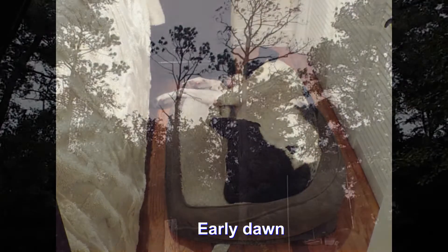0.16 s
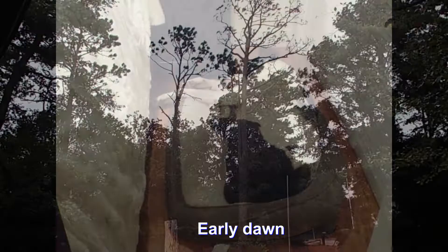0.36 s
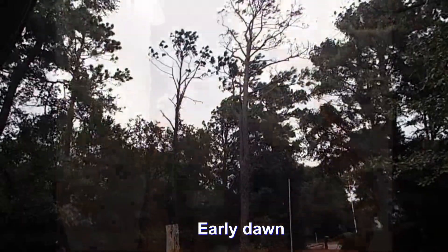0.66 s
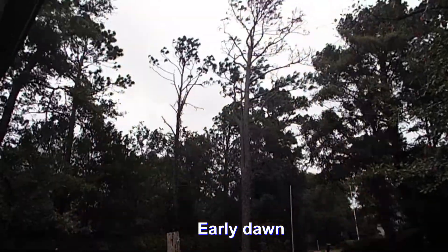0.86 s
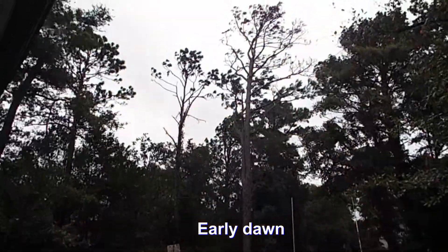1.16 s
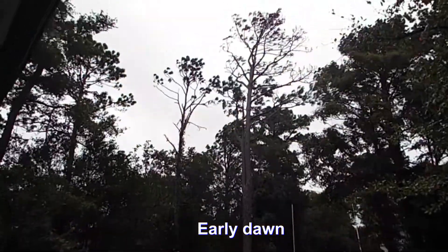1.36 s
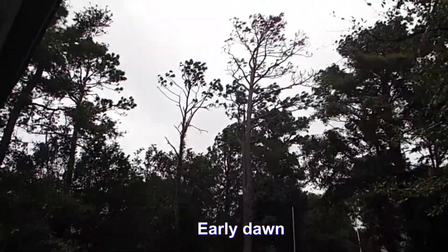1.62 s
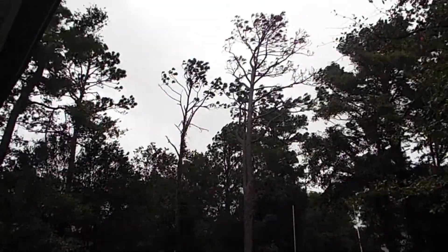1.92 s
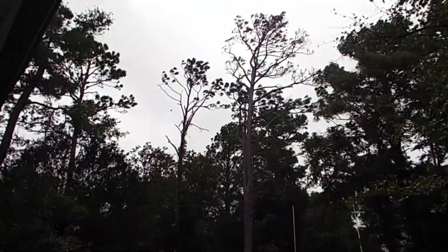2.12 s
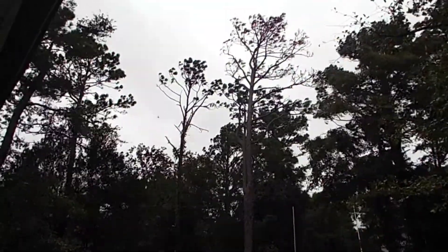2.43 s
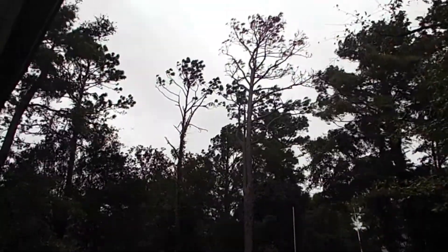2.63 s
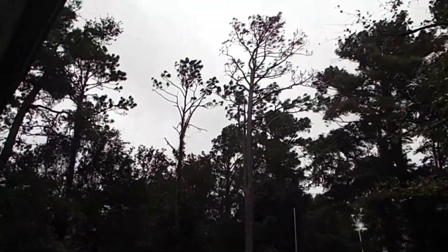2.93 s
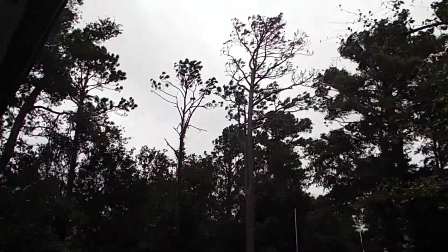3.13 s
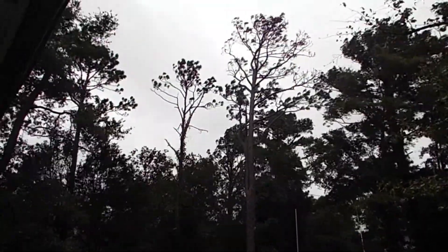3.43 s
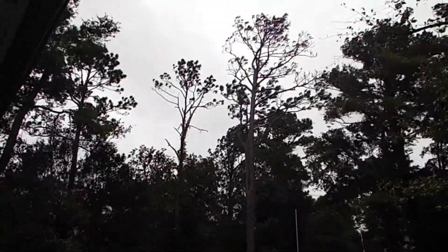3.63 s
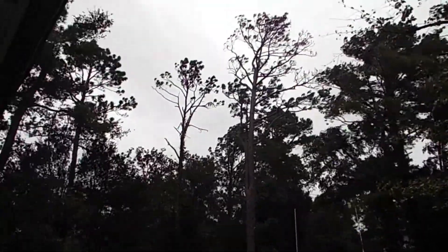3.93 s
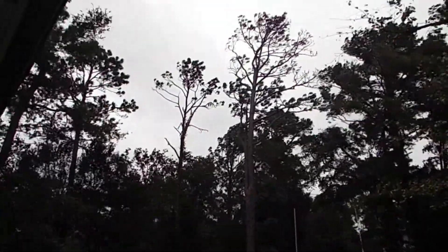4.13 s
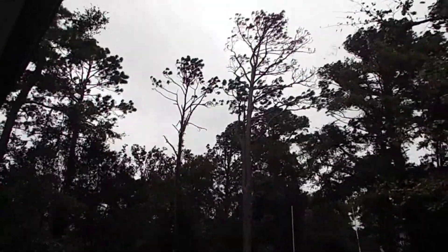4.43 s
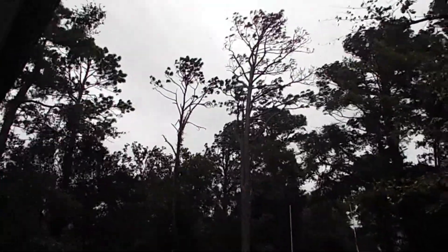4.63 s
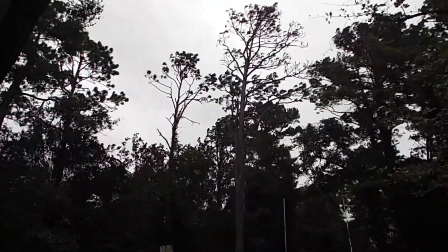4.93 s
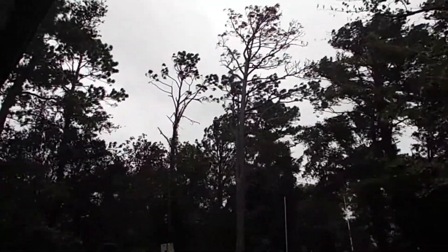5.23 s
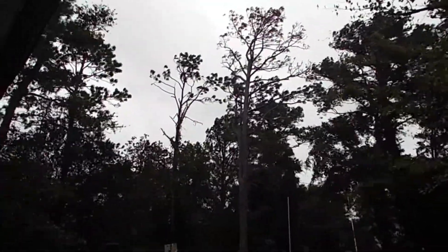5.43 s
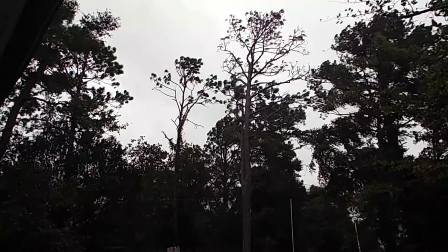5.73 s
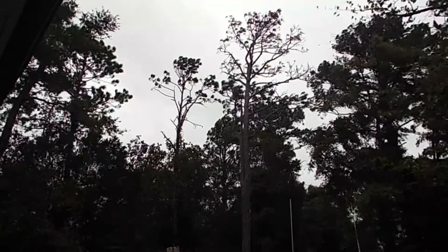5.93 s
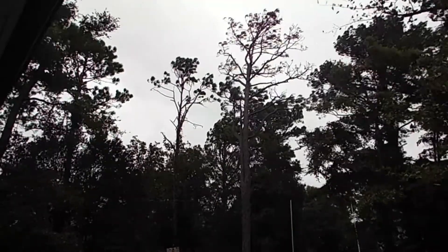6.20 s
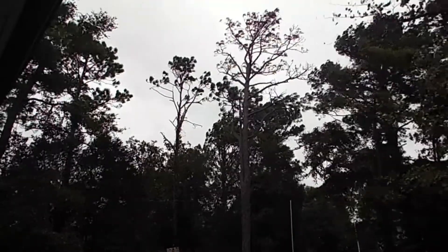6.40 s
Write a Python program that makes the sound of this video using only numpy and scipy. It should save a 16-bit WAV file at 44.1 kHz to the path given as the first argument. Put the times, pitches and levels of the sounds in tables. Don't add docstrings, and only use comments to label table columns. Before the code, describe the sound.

Storm wind blows through tall pines outdoors, heard on a small camera with two close microphones. From 0 to 0.8 seconds the rush fades in: a smooth, dense hiss of needles and twigs above a lower, broad roar from the limbs. Between about 0.65 and 1.5 seconds soft, dull puffs of wind bump the microphones, some on the left, some on the right. The hiss keeps growing through 2 and 3 seconds, with a brief low flutter near 2.4 to 2.9, mainly left. From 3.5 it is clearly stronger and brighter, with only very fine flutter. From 4.9 to 5.7 the gust peaks, and quick buffeting thumps hit either side, hardest around 5.3. After that the hiss eases by several decibels until the end at 6.5 seconds, still steady and strong.

```python
import sys
import numpy as np
from scipy import signal
from scipy.fft import rfft, irfft
from scipy.io import wavfile

SR = 44100
rng = np.random.default_rng(int(sys.argv[2]) if len(sys.argv) > 2 else 0)


def pcm_store(signal):
    levels = np.round(np.clip(np.atleast_2d(signal), -1, 1) * 32767)
    wavfile.write(sys.argv[1], SR, levels.astype(np.int16).T)


def invert_db(level):
    return 10 ** (np.asarray(level, dtype=float) / 20)


N = 289296
TIME_S = np.arange(N) / SR
TOP_HZ = 15190


def at_hz(points, hz):
    point_hz, value = np.transpose(points)
    return np.interp(np.log(hz), np.log(point_hz), value)


def drift(rate_hz):
    thin, settle = 40, 2000
    pole = np.exp(-2 * np.pi * rate_hz * thin / SR)
    noise = rng.standard_normal(N // thin + settle + 2)
    slow = signal.lfilter([1], [1, -2 * pole, pole ** 2], noise)[settle:]
    return np.interp(np.arange(N) / thin, np.arange(len(slow)), slow / slow.std())


def canopy(sway_db, patch_db):
    # time_s, level_db
    gust = [(0.0, -28.5), (1.1, -26.5), (2.2, -23.4), (3.0, -22.3), (3.5, -19.5), (4.25, -18), (4.9, -17.5),
            (5.35, -16.5), (5.9, -19), (6.56, -21.5)]
    # needle_hiss_hz, limb_roar_hz, twig_rush_hz, tip_sizzle_hz
    part_hz = (4500, 450, 1500, 10500)
    # limb_db, twig_db, tip_db
    part_share = (.1, -0.11, 0.045)
    # limb_db_per_s, twig_db_per_s, tip_db_per_s
    part_db_per_s = (-0.67, -.5, 0.43)
    # freq_hz, density_db_per_hz
    canopy_spectrum = [(45, -38.5), (130, -18.5), (310, -6.5), (660, -1), (960, -4.5), (1260, -2.5),
                       (1550, -3.5), (2500, -4.5), (5100, 0), (5700, -0.4), (7300, -7.5), (10600, -15.5),
                       (13000, -25.5), (15200, -36)]
    # freq_hz, difference_over_sum_db
    port_difference = [(30, -46), (300, -35), (700, -32.5), (1300, -28), (2400, -18.5), (4400, -13.5),
                       (8000, -9.5), (11000, -5.5), (15000, -1.5)]
    # freq_hz, left_over_right_db
    port_lean = [(1500, 0.0), (4400, .35), (8100, 1.3), (15000, 1.7)]
    # low_hz, high_hz
    hiss_range = (2500, 7500)

    hz = np.maximum(np.fft.rfftfreq(N, 1 / SR), 1)
    both, apart = rfft(rng.standard_normal((2, N))) * invert_db(at_hz(canopy_spectrum, hz))
    hiss = (hz > hiss_range[0]) & (hz < hiss_range[1])
    scale = N / np.sqrt(2 * np.sum(np.abs(both[hiss]) ** 2))
    apart = apart * invert_db(at_hz(port_difference, hz))
    lean = invert_db(at_hz(port_lean, hz) / 2)
    ports = scale * np.array([(both + apart) * lean, (both - apart) / lean])

    hiss_db = np.interp(TIME_S, *np.transpose(gust))
    offsets_db = [np.zeros(N)]
    for share, db_per_s in zip(part_share, part_db_per_s):
        offset_db = share * hiss_db + db_per_s * TIME_S
        offsets_db.append(offset_db - offset_db.mean())
    parts = sorted(zip(part_hz, offsets_db), key=lambda part: part[0])

    crown_sway = drift(4.4)
    out = np.zeros((2, N))
    centres_hz = 40 * 2.0 ** np.arange(10)
    for centre_hz in centres_hz:
        octaves = np.log2(np.clip(hz, centres_hz[0], centres_hz[-1]) / centre_hz)
        window = np.cos(np.pi / 2 * np.clip(octaves, -1, 1)) ** 2
        part_db = np.zeros(N)
        for own_hz, offset_db in parts:
            weight = at_hz([(f, f == own_hz) for f, _ in parts], centre_hz)
            part_db += weight * offset_db
        flutter_db = sway_db * crown_sway + patch_db * drift(6.6)
        out += invert_db(0.4 + hiss_db + part_db + flutter_db) * irfft(ports * window, N)
    return out


def port_wind_db():
    # start_s, hold_s, level_db
    spells = [(0.0, .2, -70), (0.33, .12, -63), (0.67, .15, -64), (0.97, 0.3, -55), (1.95, .01, -66),
              (2.44, 0.54, -58), (3.14, .03, -62), (4.05, .01, -68), (4.6, 0.17, -53), (5.03, .15, -50),
              (5.33, .02, -42), (5.62, .1, -51), (5.85, .15, -65), (6.42, .03, -68)]
    rise_db_per_s, fall_db_per_s, lull_db = 130, 130, -84
    level_db = np.full(N, float(lull_db))
    for start_s, hold_s, peak_db in spells:
        rise_db = rise_db_per_s * np.maximum(start_s - TIME_S, 0)
        fall_db = fall_db_per_s * np.maximum(TIME_S - start_s - hold_s, 0)
        level_db = np.maximum(level_db, peak_db - rise_db - fall_db)
    return level_db


def buffeting():
    low_hz, high_hz, bright_hz, dull_hz = 60, 400, 620, 190
    lumps_db, lumps_hz = 0.5, 25.0
    level_db = port_wind_db()
    bandpass = signal.butter(1, [low_hz, high_hz], "band", fs=SR, output="sos")
    noise = signal.sosfilt(bandpass, rng.standard_normal((2, N)))
    noise = signal.sosfilt(signal.butter(2, bright_hz, fs=SR, output="sos"), noise)
    dull = signal.sosfilt(signal.butter(2, dull_hz, fs=SR, output="sos"), noise)
    bright = np.clip((level_db + 65) / 16, 0, 1)
    mixed = bright * noise / noise.std() + (1 - bright) * dull / dull.std()
    lumps = invert_db(lumps_db * np.array([drift(lumps_hz), drift(lumps_hz)]))
    return invert_db(level_db) * mixed * lumps / np.sqrt(np.mean(lumps ** 2))


def puffs():
    # time_s, peak_db, swing_hz, place (-1 right port to +1 left port)
    eddies = [(0.286, -46, 72, 0.0), (0.362, -49, 64, 0.0), (0.656, -39, 207, -0.9),
              (0.84, -44.2, 220, 0.9), (0.907, -33, 168, 0.9), (0.945, -41, 176, 0.9),
              (0.975, -36, 202, 0.9), (1.127, -35.4, 166, 0.9), (1.144, -33, 112, -0.14),
              (1.25, -31, 130, 0.0), (1.256, -25, 190, -0.95), (1.402, -29, 119, 0.13),
              (1.402, -25, 210, -0.82), (1.518, -42, 105, 0.0), (2.452, -38, 90, 0.9),
              (2.838, -28, 235, 0.9), (2.874, -38, 167, 0.9), (4.897, -27, 236, 0.9),
              (4.982, -33, 238, -0.9), (5.067, -21, 258, -0.83), (5.148, -38, 247, 0.9),
              (5.24, -32.3, 277, -0.9), (5.3, -14, 361, -0.9), (5.353, -16, 440, 0.9),
              (5.45, -32.7, 175, 0.9), (5.533, -31, 212, 0.9), (5.603, -26, 329, -0.9),
              (5.644, -32, 216, -0.9), (5.687, -38, 153, -0.9)]
    one_port_cycles, shared_cycles = 0.38, 0.85
    out = np.zeros((2, N))
    t = np.arange(-1500, 1500) / SR
    for time_s, peak_db, swing_hz, place in eddies:
        cycles = one_port_cycles if place else shared_cycles
        envelope = np.exp(-0.5 * (t * swing_hz / cycles) ** 2)
        swing = envelope * np.cos(2 * np.pi * (swing_hz * t + rng.random()))
        port_gains = np.array([[(1 + place) / 2], [(1 - place) / 2]])
        first = round(time_s * SR) - len(t) // 2
        out[:, first:first + len(t)] += invert_db(peak_db) * swing * port_gains
    return out


def scene():
    fade_start_s, fade_end_s = -0.25, 0.8
    low_cut_hz, widening_db = 61, 1.5
    fade = np.clip((TIME_S - fade_start_s) / (fade_end_s - fade_start_s), 0, 1)
    trees = fade * canopy(sway_db=0.11, patch_db=0.33)
    low_cut = signal.butter(2, low_cut_hz, "high", fs=SR, output="sos")
    left, right = signal.sosfilt(low_cut, buffeting() + puffs())
    both = (left + right) / 2
    apart = (left - right) / 2 * invert_db(widening_db)
    return trees + np.array([both + apart, both - apart])


def band_limit(x):
    return signal.sosfilt(signal.butter(12, 15190, fs=SR, output="sos"), x)


def record(dry):
    hz = np.fft.rfftfreq(N, 1 / SR)
    cut = irfft(rfft(dry) * (hz < TOP_HZ), N)
    return band_limit(cut)


dry = scene()
out = record(dry)
pcm_store(out)
```